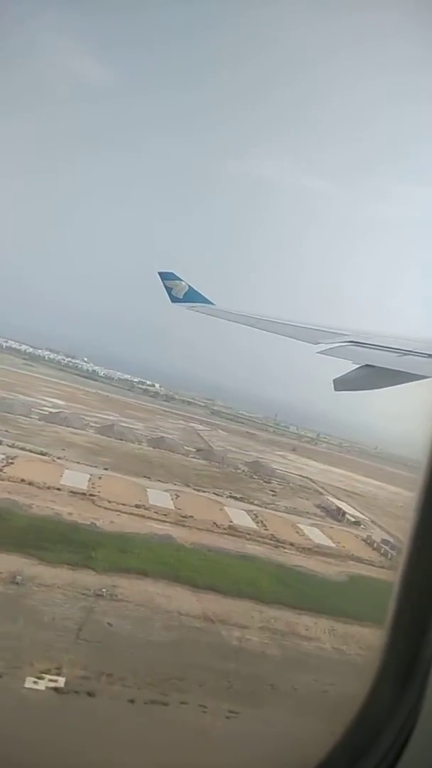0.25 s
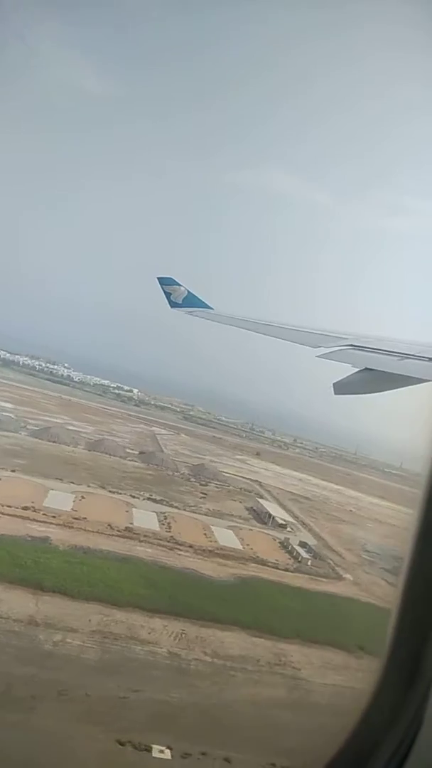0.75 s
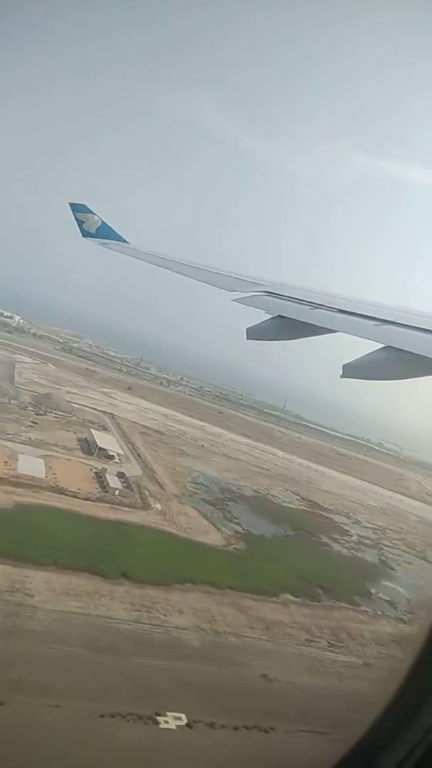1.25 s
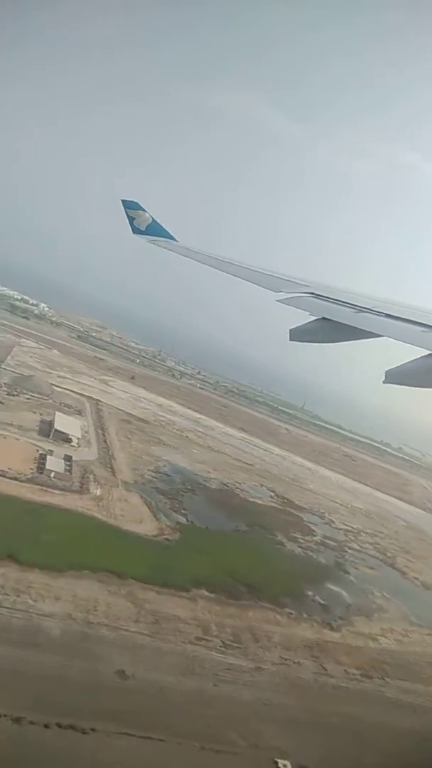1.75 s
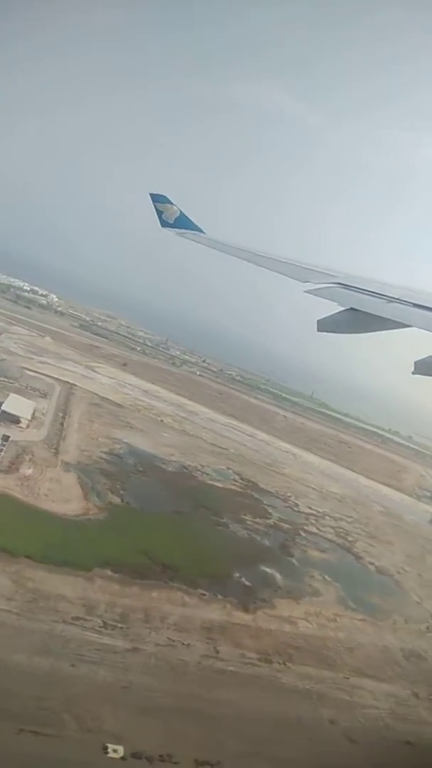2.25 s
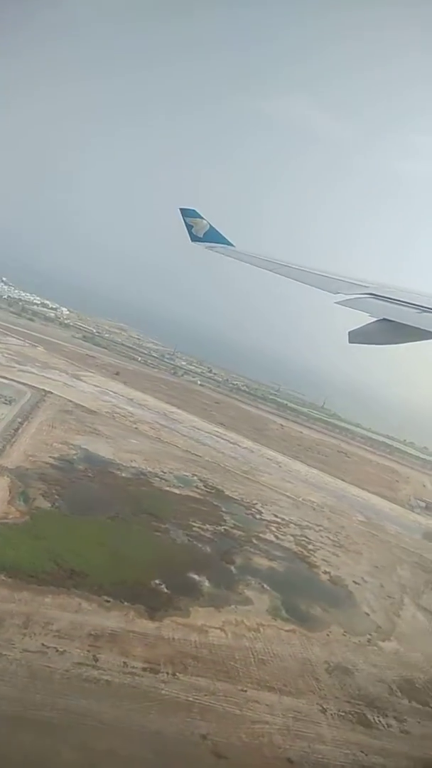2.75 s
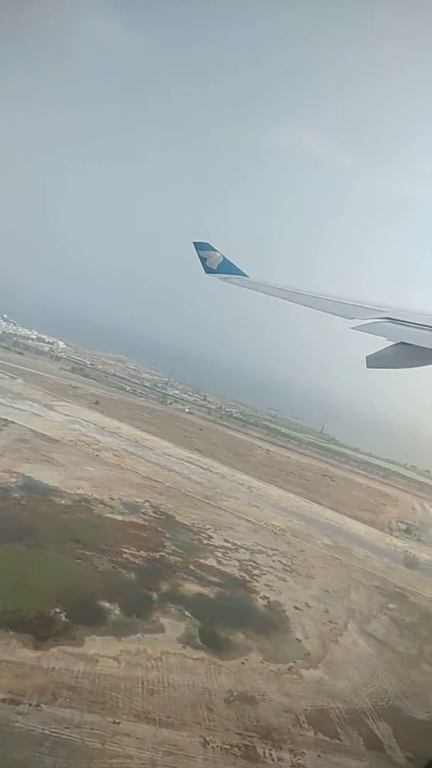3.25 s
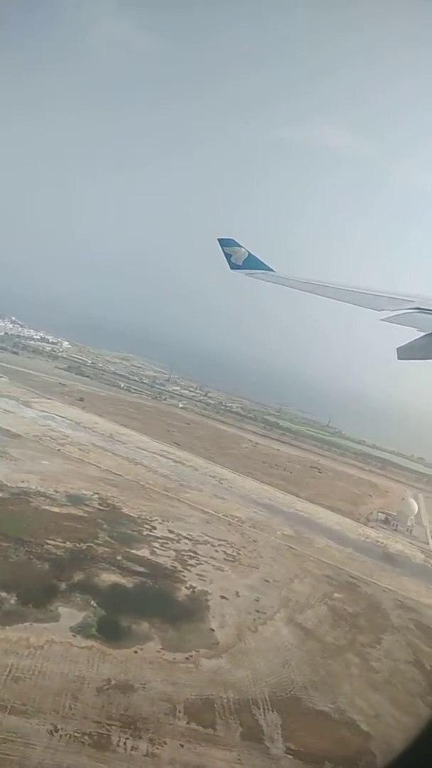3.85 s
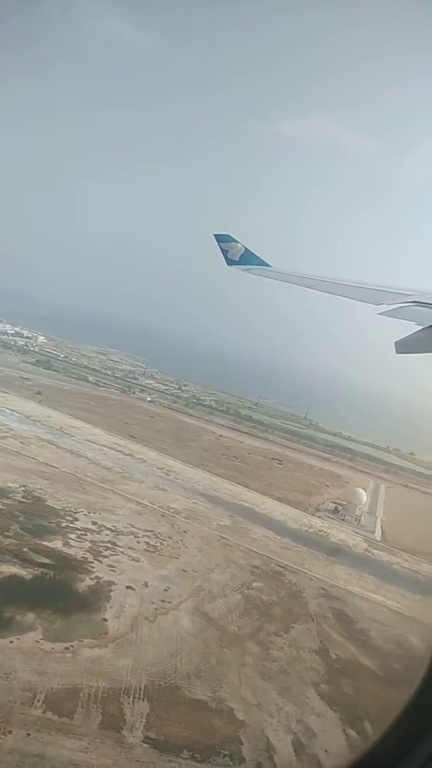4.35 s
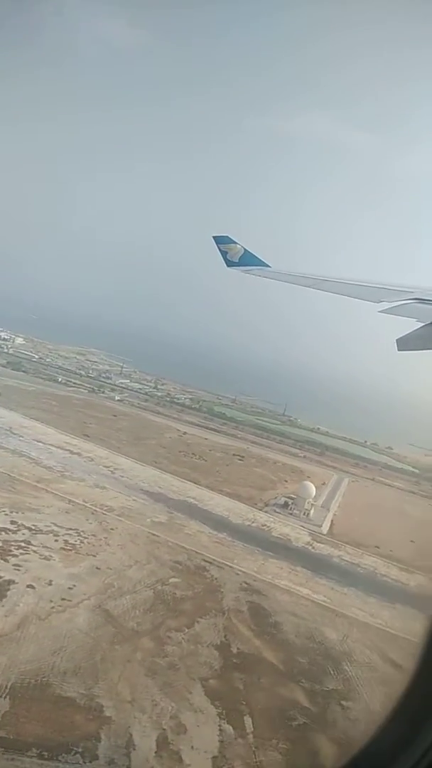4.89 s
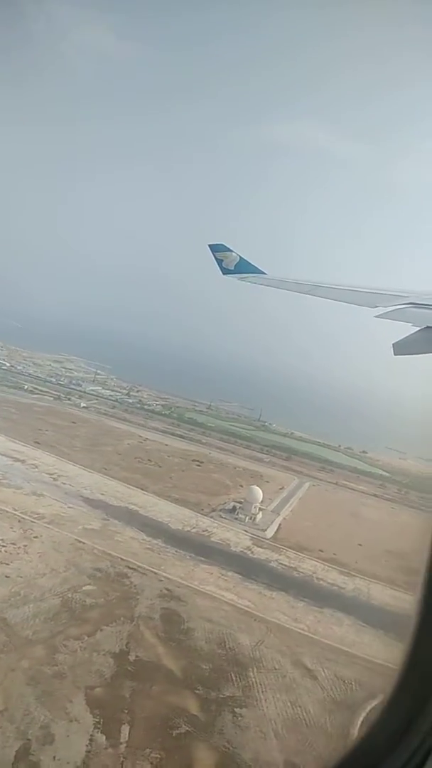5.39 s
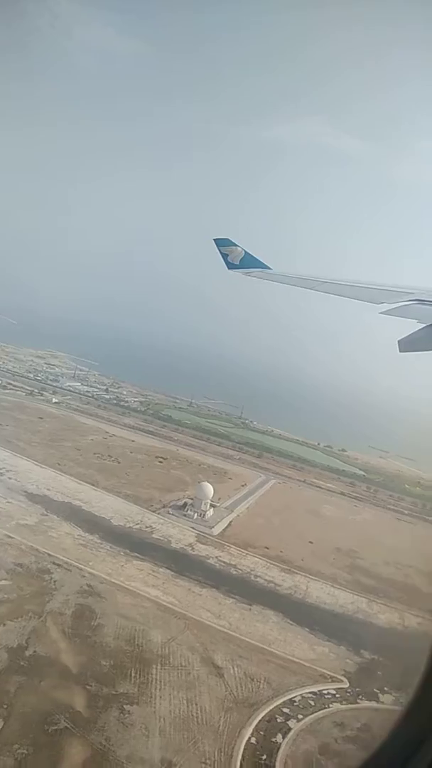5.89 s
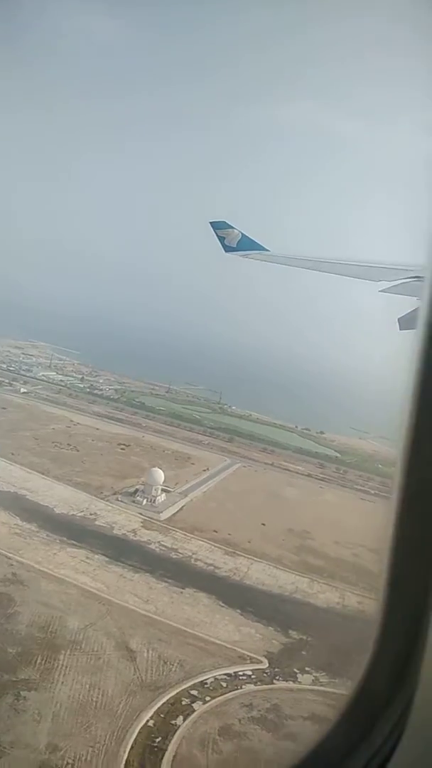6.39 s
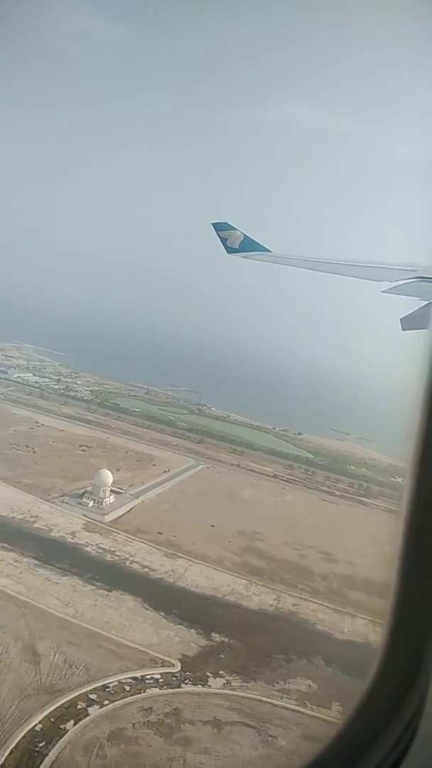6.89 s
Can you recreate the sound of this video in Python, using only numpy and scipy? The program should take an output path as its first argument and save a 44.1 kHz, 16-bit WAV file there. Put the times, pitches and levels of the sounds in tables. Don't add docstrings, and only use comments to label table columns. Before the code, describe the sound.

Inside a climbing airliner by the window, low engine roar drones on heavily while fingers faintly brush and tap the phone case.

```python
import sys
import numpy as np
from scipy import signal
from scipy.fft import rfft, irfft
from scipy.io import wavfile
from scipy.ndimage import uniform_filter1d, minimum_filter1d

SR = 44100
rng = np.random.default_rng(int(sys.argv[2]) if len(sys.argv) > 2 else 0)


def wrap_up_sound(samples):
    columns = np.atleast_2d(samples).T
    tamed = np.clip(columns, -1, 1)
    steps = np.round(tamed * 32767).astype(np.int16)
    wavfile.write(sys.argv[1], SR, steps)


def natural_amplitude(level_db):
    exponent = np.asarray(level_db, float) / 20
    return 10 ** exponent


N = 314433
SIZE, HOP = 2048, 512
HZ = np.fft.rfftfreq(SIZE, 1 / SR)
T = np.arange(N // HOP + 5) * HOP / SR

# time_s, level_db
THRUST = [(0.0, -15.5), (.1, -16.5), (.27, -13.5), (1.7, -13.5), (2.0, -14), (2.9, -13), (3.45, -14.5),
          (4.35, -14.5), (5.15, -13.5), (5.5, -16), (6.1, -15), (6.3, -16.5), (6.75, -14.5), (7.1, -11.5)]
# pitch_hz, level_db (per Hz)
HULL_LEFT = [(25, -37), (50, -45.5), (90, -27), (140, -6.5), (190, 1.5), (240, -4), (320, -8.5),
             (500, -43.5), (800, -53.5), (1700, -51.5), (2450, -80.5), (4500, -94.5), (7000, -86),
             (15500, -90.5)]
# pitch_hz, level_db (per Hz)
HULL_RIGHT = [(25, -41.5), (50, -45), (90, -21), (140, -3.5), (190, 3), (240, -10), (320, -6), (500, -26),
              (800, -35.5), (1700, -60), (2450, -78.5), (4500, -82.5), (7000, -92.5), (15500, -84)]
# pitch_hz, width_hz, level_db (per Hz)
RINGS_LEFT = [(600, 280, -33.5), (1017, 110, -31), (1394, 300, -38.5), (1980, 530, -47.5), (2600, 199, -70),
              (2970, 340, -56), (3450, 330, -66.5), (3725, 238, -59), (4000, 259, -69.5), (4470, 230, -76),
              (5187, 474, -85.5), (9008, 590, -73), (11000, 720, -76.5), (12544, 811, -71.5)]
# pitch_hz, width_hz, level_db (per Hz)
RINGS_RIGHT = [(585.3, 120, -21.5), (820, 33, -45), (985, 610, -39.5), (1100, 98, -43.5), (1350, 280, -43),
               (1660, 130, -57.5), (2220, 340, -57), (2700, 310, -58), (2860, 270, -59), (3220, 330, -64),
               (3930, 250, -70.5), (4200, 210, -67.5), (4750, 130, -68.5), (5481, 290, -81.5),
               (6350, 390, -82.5), (7380, 850, -77), (9730, 530, -74.5), (11800, 1200, -72),
               (13134, 2400, -67), (14400, 1600, -72.5)]
# pitch_hz, width_hz, level_db (per Hz)
PANEL_RING = (274, 76, -5)
# pitch_hz, likeness (0-1)
LIKENESS = [(25, .3), (45, .3), (75, .96), (190, .97), (235, .88), (300, .97), (400, .92), (500, .3),
            (1000, .42), (1800, .15), (4000, .05)]
# pitch_hz, lead_rad
LEFT_LEAD = [(60, 0), (200, .3), (430, .3), (700, 2.6), (1000, 2.9), (1500, 3.7), (2200, 5.5)]
# start_s, length_s, centre_hz, left_db, right_db
CUPS = [
    (1.242, 2.0, 900, 1, 1),
    (3.248, 1.3, 896, -0.9, -2),
    (6.305, .7, 3343, -2.5, -7.5),
]
# start_s, length_s, level_db, left_minus_right_db
STROKES = [(0.0, 0.39, -69.5, 2), (0.424, 0.15, -67, 1), (0.605, .2, -66.5, 0), (0.894, 0.08, -69, -0.5),
           (1.055, 0.41, -74, -3), (1.466, .015, -62.5, -4), (1.49, 0.22, -66.5, -6.5),
           (1.623, 0.066, -65, -4.5), (1.802, 0.32, -68.5, -3), (2.2, 0.44, -74.5, -3.5),
           (2.8, .09, -77, 0), (7.0, 0.082, -76.5, -0.5)]
# pitch_hz, level_db
RUB_TONE = [(500, -35), (1000, -14.5), (2000, -5.5), (3000, -2.5), (5400, 5.5), (6500, -5), (9000, -4),
            (12000, -15), (16000, -20)]
# start_s, length_s, over_rest_db
HUNTS = [(0.0, 1.12, 8), (1.36, 0.31, 9), (2.08, .62, 4.5), (3.02, 0.25, 5), (3.7, .85, 6), (4.6, .9, 5.5),
         (5.6, 0.58, 3.5), (6.22, .35, 7), (6.85, .3, 5.5)]
# start_s, peak_db
TICKS = [(0.0166, -42), (0.1188, -55.5), (0.31, -54), (0.3303, -58), (0.473, -49), (0.5206, -54),
         (0.66, -41.5), (0.7025, -52.5), (0.7186, -48), (0.837, -48.5), (0.876, -50), (0.959, -50.5),
         (0.9784, -52.5), (1.4065, -50), (1.6638, -51.5), (2.2942, -48.5), (2.3466, -43.5), (3.9453, -54.5),
         (3.9686, -57), (4.0114, -48), (4.028, -46.5), (4.1265, -46), (4.1685, -51), (4.2233, -52),
         (4.347, -52), (4.3663, -51), (4.3876, -50), (5.232, -64.5), (6.0379, -59)]
# start_s, peak_db, ring_hz, treble_over_ring_db, left_minus_right_db
TAPS = [(0.4308, -49, 4300, -20, -9), (0.6207, -60.5, 6250, 1, 0.5), (0.668, -44, 2840, -16, -14),
        (.6690, -49, 4940, -9, 4), (0.748, -53.5, 4500, 0, -1), (1.47, -36, 1300, -19, -11.5),
        (1.4707, -40.5, 2300, 4, -11), (1.4730, -49, 3500, -9, -9), (1.4736, -43, 5000, 8, -14),
        (1.69, -61.5, 4500, -13, 1), (4.86, -73, 5200, -24.5, 6.5), (5.146, -61, 5200, -28.5, 1.5),
        (5.486, -58, 11200, -10, 10.5), (5.904, -46, 4740, -17.5, 7), (6.2528, -46.5, 2400, -18, 7),
        (6.2526, -51, 4900, -12, 8), (6.2528, -47.5, 11100, -17, 10.5), (6.482, -68, 8600, 4, -4),
        (6.555, -62.5, 5200, -17, 1)]
# start_s, length_s, pitch_hz, level_db, left_minus_right_db
PRESSES = [
    (1.559, 0.28, 807, -52, 13.5),
    (1.978, 0.1, 774, -52.5, 16.5),
    (2.478, 0.052, 370, -26, 0),
    (3.091, 0.12, 380, -27.5, -3),
    (6.44, 0.2, 415, -31, 1),
]
# pitch_hz, level_db (per Hz)
GATE = [(600, -125), (1700, -102), (2500, -107), (4500, -108), (10800, -106.5), (12000, -108.5),
        (13300, -108), (14200, -101), (15600, -96)]


def evened(x):
    return x / np.sqrt(np.mean(np.abs(x) ** 2) + 1e-20)


def read(points, hz):
    f, value = np.transpose(points)
    return np.interp(np.log(hz + 1), np.log(f + 1), value)


def band(x, lo_hz, hi_hz):
    sos = signal.butter(2, [lo_hz, min(hi_hz, .49 * SR)], "bandpass", fs=SR, output="sos")
    return signal.sosfilt(sos, x)


def panned(db, pan_db):
    return natural_amplitude(db + np.array([[pan_db], [-pan_db]]) / 2)


def spell(t, start, length, edge_s):
    return np.clip(np.minimum(t - start, start + length - t) / edge_s + .5, 0, 1)


def port_colour(hull, rings):
    power = natural_amplitude(read(hull, HZ)) ** 2
    for hz, width, db in [PANEL_RING, *rings]:
        power = power + natural_amplitude(db) ** 2 / (1 + (2 * (HZ - hz) / width) ** 2) ** 3.36
    return np.sqrt(power)


def both_ports():
    return np.array([port_colour(HULL_LEFT, RINGS_LEFT), port_colour(HULL_RIGHT, RINGS_RIGHT)])


def patches(bins, frames):
    field = rng.standard_normal((2, len(T), len(HZ))).transpose(0, 2, 1)
    field = uniform_filter1d(field, size=bins, axis=1)
    return evened(uniform_filter1d(field, size=frames, axis=2))


def hunting(t, edge_s=.08, mean_db=4):
    return sum(db * spell(t, s, length, edge_s) for s, length, db in HUNTS) - mean_db


def cupping(octaves=0.75, edge_s=0.092):
    gain_db = 0
    for s, length, hz, left_db, right_db in CUPS:
        ports_db = np.array([left_db, right_db])[:, None, None]
        hump = np.exp(-.5 * (np.log2(HZ / hz + 1e-9) / octaves) ** 4)[:, None]
        gain_db = gain_db + ports_db * hump * spell(T, s, length, edge_s)
    return gain_db


def jets(patchy_db=1.73, top_db=-14.0, roar_share=0.19):
    a, b, c, d = rng.standard_normal((4, len(T), len(HZ))).transpose(0, 2, 1)
    same = np.clip(read(LIKENESS, HZ), 0, 1)[:, None]
    right = a + 1j * b
    left = same * right + np.sqrt(1 - same ** 2) * (c + 1j * d)
    left = left * np.exp(1j * read(LEFT_LEAD, HZ))[:, None]

    time_s, thrust_db = np.transpose(THRUST)
    rumble = np.interp(T, time_s, thrust_db)
    rumble = rumble - rumble.mean()
    roar, hiss = roar_share * rumble, hunting(T)
    low = read([(400, 0.89), (520, 0)], HZ)[:, None]
    high = read([(6000, 0.037), (11000, 0.79)], HZ)[:, None]
    swell_db = low * rumble + (1 - low - high) * roar + high * hiss + cupping()

    patch_db = patchy_db * (1 - 0.61 * low) * patches(bins=14, frames=9)
    gust_db = read([(3500, 0), (6000, 4.0), (10500, 4.0), (12000, 2.3)], HZ)[:, None]
    patch_db = patch_db + gust_db * patches(bins=300, frames=4)
    z = np.array([left, right]) * both_ports()[..., None] * natural_amplitude(swell_db + patch_db)
    sound = signal.istft(z, nperseg=SIZE, noverlap=SIZE - HOP)[1][:, :N]
    return natural_amplitude(top_db) * evened(sound)


def strokes(grip_s=0.0054, let_go_db_per_s=131.5, rest_db=-80.5):
    t, level = np.arange(N) / SR, natural_amplitude(rest_db)
    for s, length, db, pan_db in STROKES:
        grip = np.clip((t - s) / grip_s + 1, 0, 1)
        let_go = natural_amplitude(-let_go_db_per_s * np.maximum(t - s - length, 0))
        level = np.maximum(level, panned(db, pan_db) * grip * let_go)
    return level


def rubbing(grains_per_s=1500, spread_db=4.):
    jerks = natural_amplitude(spread_db * np.minimum(rng.exponential(1, (2, N)), 5))
    jerks = jerks * (rng.random((2, N)) < grains_per_s / SR)
    roughness = evened(uniform_filter1d(jerks, size=40, axis=1))
    slip = rng.standard_normal((2, N)) * (1 + .8 * roughness)
    ports = both_ports() ** .85 * natural_amplitude(read(RUB_TONE, HZ))
    fine_hz = np.fft.rfftfreq(N, 1 / SR)
    slip = irfft(rfft(slip) * [np.interp(fine_hz, HZ, port) for port in ports], N)
    slip = slip / np.std(band(slip, 3300, 5600), axis=1, keepdims=True)
    return slip * natural_amplitude(4.0) * strokes()


def lens(hz=13600, per_s=260, small_db=-66, left_db=-26):
    busy = natural_amplitude(hunting(np.arange(N) / SR))
    sizes = natural_amplitude(small_db + 3.5 * np.minimum(rng.exponential(1, N), 4))
    steps = busy * sizes * (rng.random(N) < per_s / SR)
    s, db = np.transpose(TICKS)
    steps[np.round(s * SR).astype(int)] = natural_amplitude(db + 7.0)
    u = np.arange(-40, 41) / SR
    tick = np.cos(2 * np.pi * hz * u) * np.exp(-.5 * (u / .00012) ** 2)
    return signal.oaconvolve(steps, tick)[20:N + 20] * natural_amplitude(np.array([[left_db], [0]]))


def taps(crack_s=0.01, tail_s=0.26, scuff_db=-67, scuff_share=.45):
    out, t = np.zeros((2, N + SR)), np.arange(SR // 4) / SR
    noises = rng.standard_normal((len(TAPS), 2, len(t)))
    for (s, db, hz, treble_db, pan_db), noise in zip(TAPS, noises):
        width = np.clip(520 + 16 * (db + 47.5), 150, 600)
        ring = band(band(noise, hz - width, hz + width), hz - 1.4 * width, hz + 1.4 * width)
        treble = band(band(noise, 7000, 11000), 5300, 12000)
        tone = evened(ring) + natural_amplitude(treble_db) * evened(treble)
        tone = tone / np.std(tone[:, :SR // 150], axis=1, keepdims=True)
        crack = natural_amplitude(-60 * t / (crack_s * 2))
        scuff = natural_amplitude(scuff_db + scuff_share * (db + 56) - db - 60 * t / tail_s)
        shape = np.minimum(t / 0.0011, 1) * (crack + scuff)
        out[:, round(s * SR):][:, :len(t)] += panned(db, pan_db) * tone * shape
    return out[:, :N]


def presses(width_over_pitch=.33):
    out = np.zeros((2, N + SR))
    noises = rng.standard_normal((len(PRESSES), SR // 2))
    for (s, length, hz, db, pan_db), noise in zip(PRESSES, noises):
        width = width_over_pitch * hz
        scuff = band(band(noise, hz - width / 2, hz + width / 2), hz - width, hz + width)
        scuff = evened(scuff)[:round(length * SR)]
        scuff = scuff * signal.windows.tukey(len(scuff), .5)
        out[:, round(s * SR):][:, :len(scuff)] += panned(db, pan_db) * scuff
    return out[:, :N]


def scene():
    return jets() + rubbing() + lens() + taps() + presses()


def gate(x, wander_db=2.5, band_wander_db=2.2):
    lead = 2 * x[:, :1] - x[:, 153:0:-1]
    framing = dict(window="cosine", nperseg=SIZE, noverlap=SIZE // 2)
    z = signal.stft(np.hstack([lead, x]), boundary="odd", **framing)[2]
    power = np.abs(z) ** 2 / natural_amplitude(11) ** 2 + 1e-20
    band_of_bin = np.arange(len(HZ)) // 32
    bands = np.add.reduceat(power, np.arange(0, len(HZ), 32), axis=1)[:, band_of_bin] / 32

    frames = z.shape[2]
    wander = evened(uniform_filter1d(rng.standard_normal((frames, 2)), size=3, axis=0)).T[:, None]
    band_wander = evened(uniform_filter1d(rng.standard_normal((frames, 2, 33)), size=4, axis=0))
    band_wander = band_wander.transpose(1, 2, 0)[:, band_of_bin]
    bar_db = read(GATE, HZ)[:, None] + wander_db * wander + band_wander_db * band_wander
    bar = natural_amplitude(bar_db) ** 2
    kept = (power > bar) & (bands > bar / 3)
    return signal.istft(z * kept, **framing)[1][:, lead.shape[1]:][:, :N]


def top_cut(x):
    return signal.sosfilt(signal.butter(12, 15700, fs=SR, output="sos"), x)


def record(dry):
    hissy = dry + natural_amplitude(-70) * rng.standard_normal(dry.shape)
    room = np.minimum(1, .697 / (np.abs(hissy).max(0) + 1e-9))
    gain = uniform_filter1d(minimum_filter1d(room, size=441), size=441)
    return top_cut(gate(hissy * gain))


dry = scene()
out = record(dry)
wrap_up_sound(out)
```